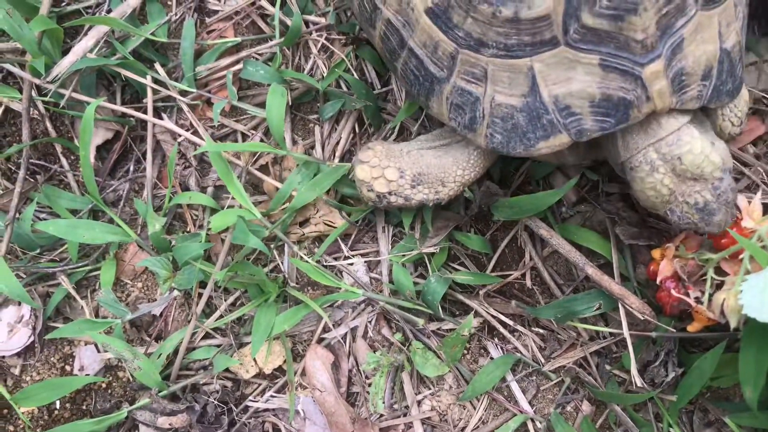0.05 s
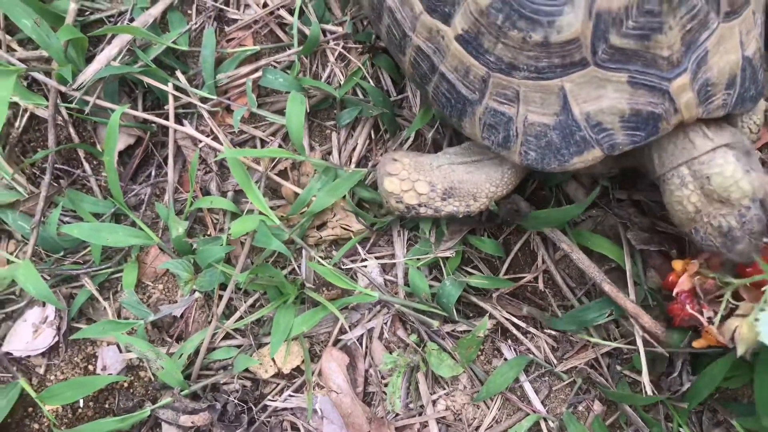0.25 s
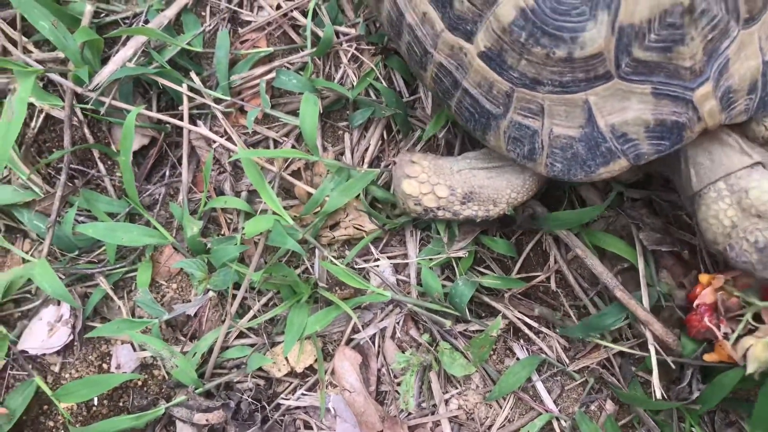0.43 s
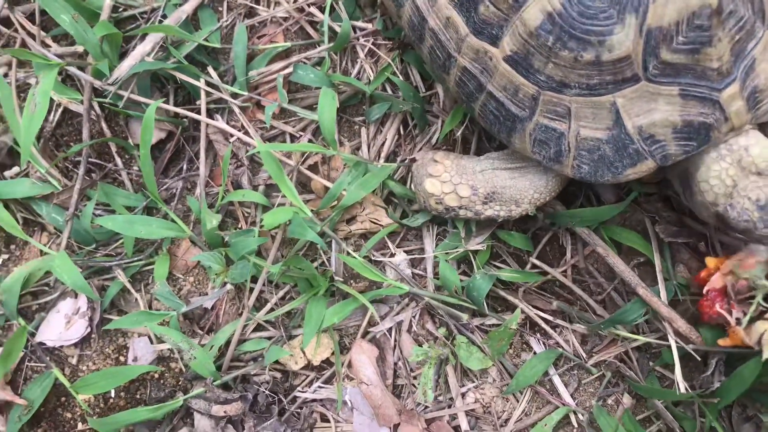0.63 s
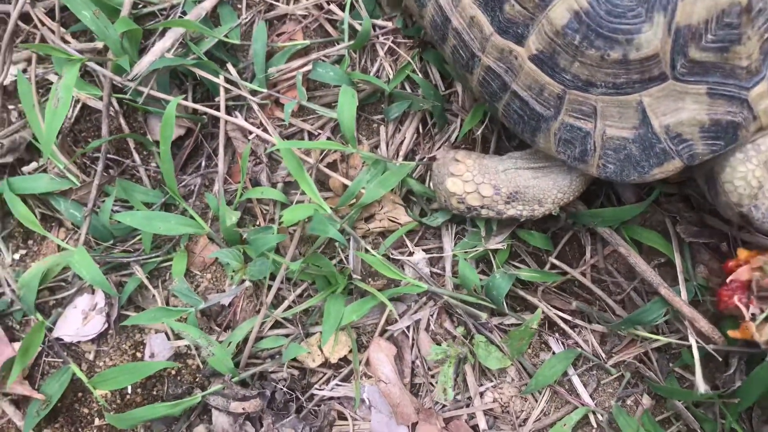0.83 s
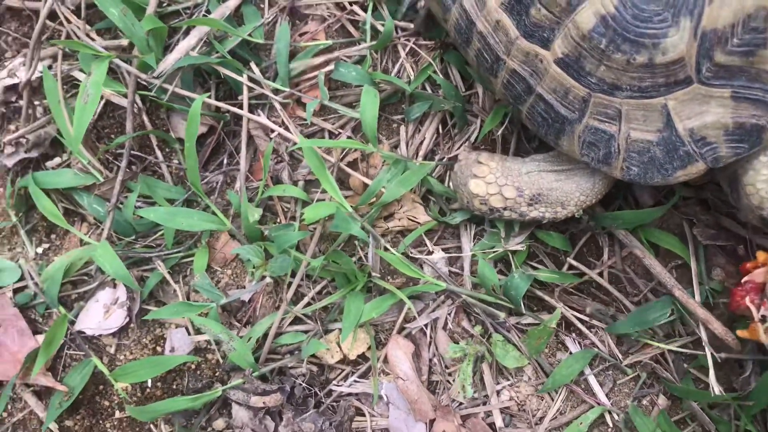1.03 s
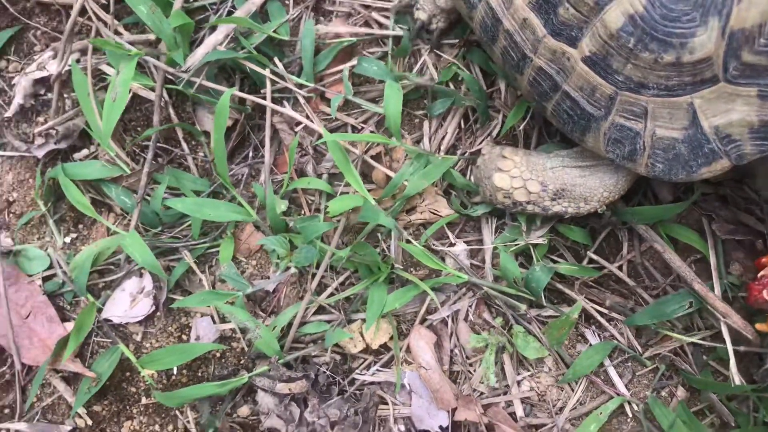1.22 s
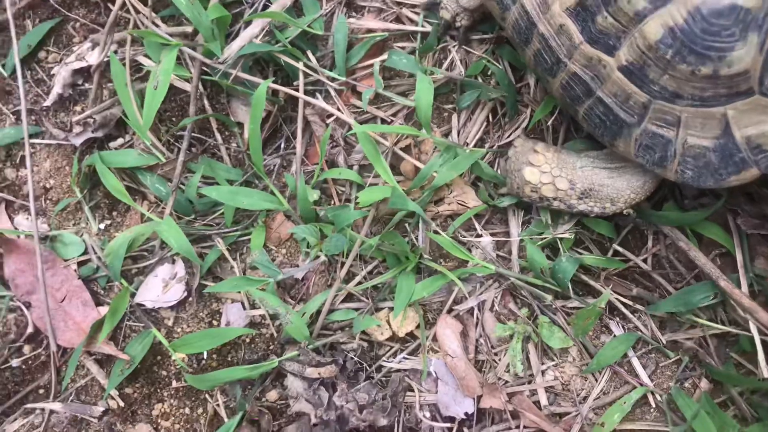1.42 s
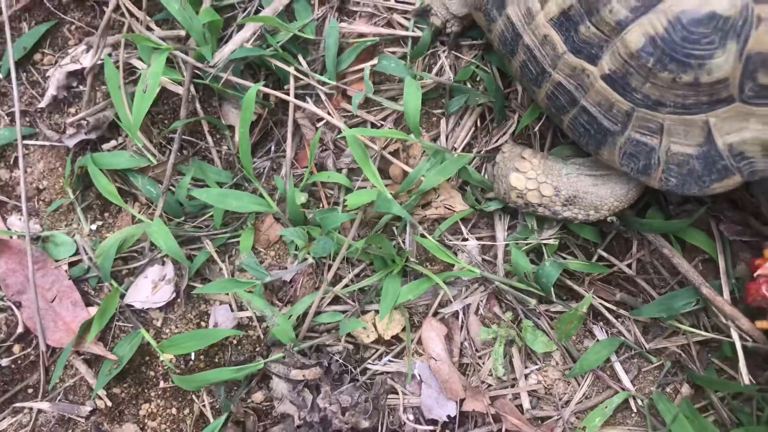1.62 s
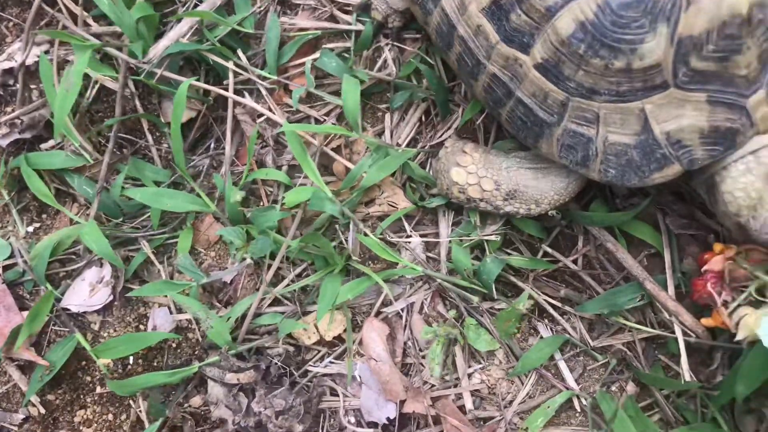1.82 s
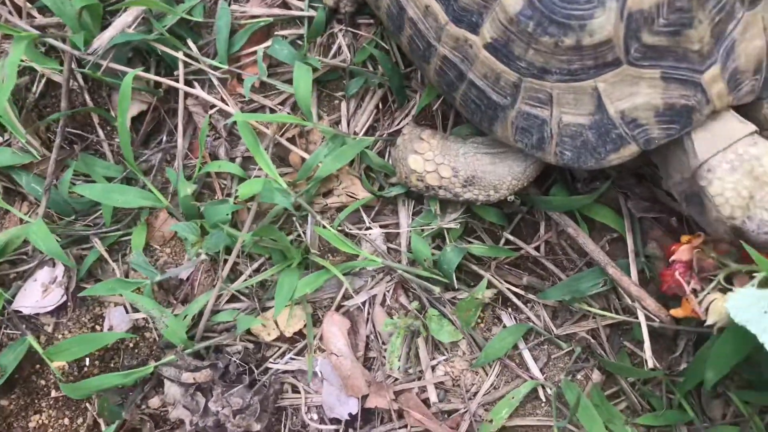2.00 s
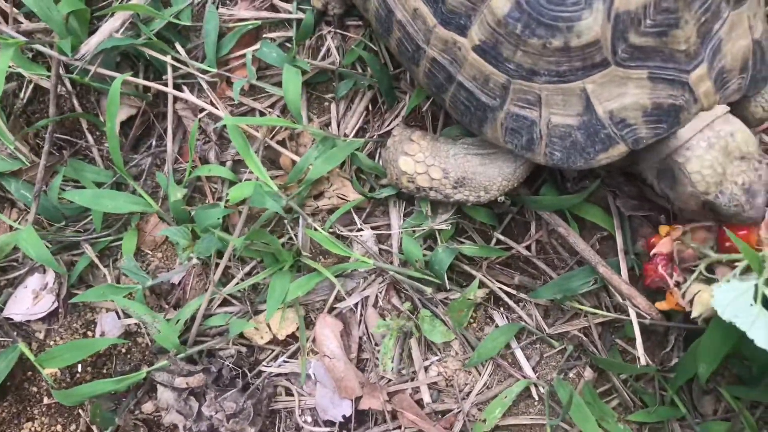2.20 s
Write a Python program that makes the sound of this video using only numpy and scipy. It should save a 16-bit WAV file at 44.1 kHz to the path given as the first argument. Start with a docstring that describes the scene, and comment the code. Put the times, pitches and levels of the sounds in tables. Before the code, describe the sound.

Close crunching and snapping as a tortoise tugs at a plant, then two small beak clacks.

```python
"""Outdoors on leafy ground, close to the microphone, a tortoise bites and tears at a sprig of berries.
Fibres crackle as they break and the moist stalk squeaks through the beak until it snaps.
Dry litter rustles under the animal; near the end its horny jaws meet in two ringing clacks.
Farther off lie a low rumble and a faint hiss."""
import sys
import numpy as np
from scipy import signal
from scipy.fft import rfft, irfft
from scipy.io import wavfile

SR = 44100
rng = np.random.default_rng(int(sys.argv[2]) if len(sys.argv) > 2 else 0)


def to_wav(sig):
    """Store sig (one row per channel, or 1-D mono) as 16-bit WAV at the path in sys.argv[1].

    Samples outside -1..1 are clipped; the rate is SR.
    """
    pcm = np.clip(np.atleast_2d(sig), -1, 1) * 32767
    pcm = np.round(pcm).astype(np.int16)
    wavfile.write(sys.argv[1], SR, pcm.T)  # frames by channels


N = 103635
BAND_LIMIT_HZ = 15900


def amp(db):
    """Decibels to gain."""
    return 10 ** (np.asarray(db) / 20)


def unit_rms(x):
    """Scales to rms 1."""
    return x / np.sqrt(np.mean(x ** 2) + 1e-20)


def curve(rows, column=1):
    """One column of a time table at every sample."""
    rows = np.array(rows)
    return np.interp(np.arange(N) / SR, rows[:, 0], rows[:, column])


def add(mix, start_s, sound):
    """Mixes a sound in at its start time."""
    part = mix[max(round(start_s * SR), 0):][:len(sound)]
    part += sound[:len(part)]


def coloured(x, spectrum):
    """Filters x by a spectrum table up to the band limit, at rms 1."""
    table_hz, db = np.transpose(spectrum)
    hz = np.fft.rfftfreq(len(x), 1 / SR)
    gain = amp(np.interp(np.log(hz + 1), np.log(table_hz), db)) * (hz < BAND_LIMIT_HZ)
    return unit_rms(irfft(rfft(x) * gain, len(x)))


def resonate(x, hz, width_hz):
    """A steep resonance, steady or gliding, at rms 1."""
    carrier = np.exp(2j * np.pi * np.cumsum(hz * np.ones(len(x))) / SR)
    pole = np.exp(-np.pi * width_hz / SR)
    return unit_rms((carrier * signal.lfilter([1], [1, -2 * pole, pole * pole], x / carrier)).real)


def grains(per_s, spread_db, grain_s):
    """Tiny fractures at random times, each a brief burst of noise."""
    sizes = amp(spread_db * np.minimum(rng.exponential(1, N), np.pi))
    onsets = rng.random(N) < per_s / SR
    power = signal.lfilter([1], [1, -np.exp(-2 / (grain_s * SR))], (sizes * onsets) ** 2)
    return np.sqrt(power) * rng.standard_normal(N)


# Open air behind the animal: f/Hz, relative level/dB
AIR_SPECTRUM = [(20, -24), (32, -15.5), (45, 0), (63, 3.5), (80, 1), (105, -11), (170, -10.5), (260, -17),
                (420, -25), (800, -29.5), (2000, -38), (5000, -43), (10500, -65), (13000, -45),
                (15500, -43)]

def outdoor_air():
    """A steady low rumble with a faint hiss."""
    return amp(-55.5) * coloured(rng.standard_normal(N), AIR_SPECTRUM)


def with_scatter(direct, decay_s=0.004, level_db=-19.5):
    """The direct sound reaches the microphone with a weak, quick scatter off ground and shell."""
    t = np.arange(4096) / SR
    tail = rng.standard_normal(len(t)) * np.exp(-t / decay_s) * np.minimum(t / 0.00067, 1)
    return direct + amp(level_db) * signal.fftconvolve(direct, tail / np.linalg.norm(tail))[:N]


# Litter shifting under the animal, close by: t/s, level/dB
LITTER_LEVELS = [(0, -56.5), (.04, -52), (.085, -55), (.115, -54), (.15, -55.5), (.2, -51.5), (.275, -53),
                 (.305, -59), (.38, -52), (.7, -53), (.74, -50), (.8, -50.5), (.9, -50), (.94, -59.5),
                 (.985, -53.5), (1.05, -63.5), (1.09, -59), (1.13, -70.5), (1.16, -58), (1.19, -67),
                 (1.243, -55.5), (1.27, -61), (1.32, -55.5), (1.375, -65), (1.405, -54), (1.43, -63.5),
                 (1.465, -61), (1.5, -70), (1.55, -70.5), (1.57, -62), (1.6, -71.5), (1.75, -71),
                 (1.775, -72), (1.81, -74), (1.91, -67), (1.98, -66), (2.04, -65), (2.09, -70),
                 (2.14, -63.5), (2.2, -64.5), (2.25, -71.5), (2.35, -72.5)]
# Colour of the rustle: f/Hz, relative level/dB
LITTER_SPECTRUM = [(150, -36), (600, -9.5), (1200, -0.5), (2300, -1), (4300, 0.5), (5000, -1.5), (6200, 3),
                   (7600, -1), (9000, 2), (10500, -2.5), (12500, 2), (15500, 0)]

def leaf_litter():
    """Dry leaves and grass scrape in a fine-grained rustle."""
    scrapes = grains(per_s=9000, spread_db=4.5, grain_s=0.00034)
    return amp(curve(LITTER_LEVELS)) * coloured(scrapes, LITTER_SPECTRUM)


# Knocks of the beak on the sprig: t/s, level/dB, f/Hz
GRIP_KNOCKS = [(.3858, -37, 950), (.4079, -41, 850), (.4107, -34, 170), (.4479, -37, 1100),
               (.4784, -34, 1100)]

def grip_knock(db, hz, decay_cycles=1.3):
    """The beak grips and tugs with a dull knock that dies within a few cycles."""
    cycles = hz * np.arange(4096) / SR
    envelope = np.exp(-cycles / decay_cycles) * (1 - np.exp(-cycles / 0.11))
    return amp(db) * envelope * np.sin(2 * np.pi * cycles)


# The beak shutting, close up: t/s, level/dB, pitch factor, ring time factor, tilt/(dB per octave)
BEAK_CLACKS = [(2.0954, -28.5, 1.0, 0.93, -1), (2.1255, -30, .93, 0.62, -4)]
# Modes of the beak, before each clack scales them: f/Hz, relative level/dB, t60/s
BEAK_MODES = [(1340, -4.5, 0.0042), (1970, -0.5, .005), (2755, 2, 0.0097), (2830, -18, 0.049),
              (4100, -13, 0.0095), (6770, -4.5, 0.0073), (8400, -4, 0.0018)]

def beak_clack(db, pitch, ring_factor, tilt_db):
    """The horny jaws meet and ring briefly."""
    t = np.arange(2048) / SR
    ring = np.zeros(len(t))
    for k, (hz, mode_db, t60) in enumerate(BEAK_MODES):
        envelope = amp(mode_db + tilt_db * np.log2(hz / 2000) - 60 * t / (t60 * ring_factor))
        ring += (-1) ** k * envelope * np.sin(2 * np.pi * hz * pitch * t)
    return amp(db) * ring * np.minimum(t / 0.00022, 1)


# The stalk under tension: t/s, f/Hz, level/dB
STALK_RUB = [(.51, 6700, -78), (.527, 6400, -46), (.552, 6200, -41), (.562, 5900, -49), (.585, 6050, -37.5),
             (.612, 5600, -45.5), (.632, 5300, -42), (.66, 5200, -75.5)]

def stalk_rub():
    """Pulled taut, the stalk rubs in a narrow band of noise that sinks in pitch."""
    t = np.arange(N) / SR
    taut = (t > STALK_RUB[0][0]) & (t < STALK_RUB[-1][0])
    friction = grains(per_s=8200, spread_db=0, grain_s=0.0012)
    return taut * amp(curve(STALK_RUB, column=2)) * resonate(friction, curve(STALK_RUB), width_hz=1020)


# The sprig tearing, right at the microphone: t/s, crackle level/dB, crunch level/dB
TEAR_LEVELS = [(.375, -93, -75), (.395, -45.5, -59), (.422, -42.5, -51), (.445, -36, -55), (.456, -39, -51),
               (.476, -33, -44), (.498, -35.5, -54), (.507, -42.5, -56), (.526, -36.5, -61.5),
               (.562, -43.5, -92), (.578, -45.5, -52), (.598, -39, -52.5), (.622, -41, -46.5),
               (.655, -40, -53), (.675, -43.5, -51), (.71, -51.5, -58), (.75, -87, -76)]
# Colours of the bright crackle and the dull crunch: f/Hz, relative level/dB
CRACKLE_SPECTRUM = [(300, -30), (1500, -12), (3000, -1), (4400, 2), (5300, 0), (6500, 1), (8600, 0.5),
                    (10500, 1), (12300, -0.5), (15500, -5)]
CRUNCH_SPECTRUM = [(100, -30), (300, -10), (650, -7), (1100, -0.5), (1450, -0.5), (1800, -4), (2600, -3),
                   (4500, -10), (16000, -41)]

def tearing():
    """Fine fibres give way in a dense crackle over a duller crunch."""
    crackle = coloured(grains(per_s=5000, spread_db=4, grain_s=0.00066), CRACKLE_SPECTRUM)
    crunch = coloured(grains(per_s=3100, spread_db=1.5, grain_s=0.0012), CRUNCH_SPECTRUM)
    return amp(curve(TEAR_LEVELS)) * crackle + amp(curve(TEAR_LEVELS, column=2)) * crunch


# Slips in the beak, close up: t/s, length/s, level/dB, f/Hz
STALK_SQUEAKS = [(0.3962, 0.004, -42, 6800), (0.5128, 0.0052, -29.5, 4270), (0.5195, 0.005, -32, 6590),
                 (0.546, 0.008, -42, 5920), (0.5765, 0.0032, -33, 6190), (0.5915, 0.0026, -42, 6300),
                 (0.6063, 0.0037, -30.5, 5150), (0.7002, 0.0067, -44, 3836), (0.829, 0.0028, -44.5, 6960),
                 (0.963, 0.0022, -53, 5750), (1.401, 0.0067, -60, 3850), (1.7658, 0.0043, -56.5, 5170),
                 (2.032, 0.0021, -52, 4660)]
# Bright colour of the rasps and cracks, with the microphone's treble peaks and dip:
# f/Hz, relative level/dB
CRACK_SPECTRUM = [(150, -28), (600, -13.5), (1300, -4), (2300, 2), (3300, 0.5), (5000, 2), (7000, -4.5),
                  (9000, 6.5), (10500, -2.5), (13000, 1), (15500, -4.5)]

def stalk_squeak(length_s, db, hz, tone_width_hz=130):
    """The moist stalk slips through the beak: one unsteady resonance with a rasp around it."""
    t = np.arange(1024) / SR
    envelope = np.minimum(t / 0.0002, 1) * np.exp(-np.maximum(t - 0.7 * length_s, 0) / 0.0012)
    phase_drift = np.cumsum(rng.standard_normal(len(t))) * np.sqrt(2 * np.pi * tone_width_hz / SR)
    tone = unit_rms(envelope * np.sin(2 * np.pi * hz * t + phase_drift))
    friction = resonate(rng.standard_normal(len(t)), hz, width_hz=4100)
    rasp = unit_rms(envelope * coloured(friction, CRACK_SPECTRUM))
    return amp(db) * (amp(-3) * tone + amp(-4) * rasp) * np.sqrt(length_s / t[-1])


def fracture(samples, onset_s, smear_s=0.0006):
    """One clean break, smeared a little as the treble runs ahead of the bass along the stalk."""
    f = np.fft.rfftfreq(samples, 1 / SR)
    delay_s = onset_s + smear_s * np.maximum(1 - f / BAND_LIMIT_HZ, 0)
    return unit_rms(irfft(np.exp(-2j * np.pi * np.cumsum(delay_s) * f[1])))


# Fibres breaking at the microphone: t/s, crack level/dB, tilt/(dB per octave), ring f/Hz, ring level/dB
FIBRE_BREAKS = [(0.1106, -53, -6, 4200, -53.5), (0.1906, -45, 4.5, 9040, -62), (0.2067, -56, 7, 8180, -67),
                (0.2268, -49, 6, 9600, -59), (0.2371, -44.5, 0.8, 9500, -54), (0.2483, -46, 19, 14100, -47),
                (0.2566, -50, 1.5, 10030, -63), (0.2767, -45, 2, 7000, -50), (0.2828, -45, 9, 9040, -57),
                (0.2892, -51, 0, 7490, -58.5), (0.3855, -33.5, 7.5, 9040, -34),
                (0.3888, -41.5, 1.5, 12400, -47), (0.4081, -44, -8, 6890, -47.5),
                (0.4457, -41, -8, 9000, -33.5), (0.4479, -50.5, -4, 8740, -49),
                (0.4643, -37.5, -2.5, 7800, -34.5), (0.476, -36, -2, 7360, -40),
                (0.4782, -41, 7, 8700, -40.5), (0.4894, -43, 4, 8480, -38), (0.5942, -35.5, 4.1, 8440, -39),
                (0.5959, -34, 11, 10000, -41), (0.6421, -37, 2, 13000, -46), (0.6444, -44, 11, 13390, -59),
                (0.6604, -27.5, 7, 4320, -25), (0.6612, -35.5, 4, 3270, -33.5),
                (0.7514, -51, -3.5, 12360, -60), (0.8694, -42, 0.5, 5460, -41.5),
                (0.8925, -37, 7, 9270, -39), (0.8969, -56, -5, 12700, -60),
                (0.9093, -47.5, 2.2, 15460, -52), (1.2389, -52, 0.5, 5680, -50),
                (1.4016, -56, 5, 5300, -56), (1.7722, -59.5, 6, 6900, -68), (1.7822, -62, 1, 9000, -73),
                (1.8541, -43, 2.5, 9300, -66), (2.0545, -46.5, 4.5, 14700, -69)]

def fibre_snap(crack_db, tilt_db, hz, ring_db, rise_s=0.00026, ring_cycles=5):
    """A fibre breaks: a sharp crack with a scatter of splinters, and a brief ring of the stalk."""
    t = np.arange(1024) / SR
    attack = np.minimum(t / rise_s, 1)
    decay = np.exp(-t / 0.00015) + amp(-21) * np.exp(-t / 0.002)  # a spike, then a faint tail
    splinters = unit_rms(rng.choice([-1., 1.], len(t)) * attack * decay)
    burst = np.pad(amp(-0.5) * splinters + fracture(len(t), rise_s), 512)
    f = np.fft.rfftfreq(len(burst), 1 / SR)
    tilt = amp(tilt_db * np.log2((f + 300) / 6000))
    crack = coloured(irfft(rfft(burst) * tilt), CRACK_SPECTRUM)[500:1524]  # trim the padding
    phase_drift = 0.09 * np.cumsum(rng.standard_normal(len(t)))
    ring = np.sin(2 * np.pi * hz * t + phase_drift) * np.exp(-t * hz / ring_cycles) * attack
    snap = amp(crack_db) * unit_rms(crack) + amp(ring_db) * unit_rms(ring)
    return snap * np.sqrt(0.004 / t[-1])  # levels count the energy as spread over 4 ms


def scene():
    """One microphone close to the feeding tortoise, with the open air behind."""
    near = tearing() + stalk_rub() + leaf_litter()
    for events, source in ((FIBRE_BREAKS, fibre_snap), (STALK_SQUEAKS, stalk_squeak),
                           (BEAK_CLACKS, beak_clack), (GRIP_KNOCKS, grip_knock)):
        for start_s, *settings in events:
            add(near, start_s, source(*settings))
    return (with_scatter(near) + outdoor_air())[None]


def record(dry):
    """The recorder cuts the treble above its band limit."""
    lowpass = signal.firwin(255, BAND_LIMIT_HZ, window=("kaiser", 8), fs=SR)
    return signal.oaconvolve(dry, lowpass[None], "same")


dry = scene()
out = record(dry)
to_wav(out)
```